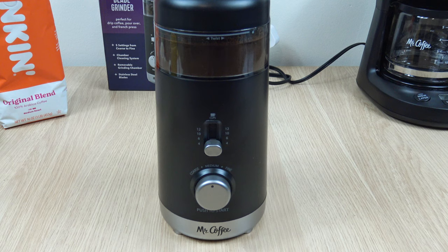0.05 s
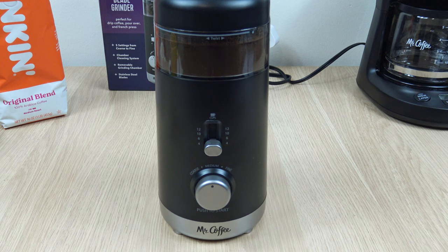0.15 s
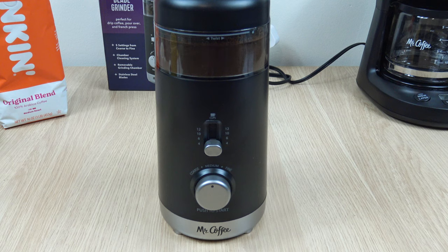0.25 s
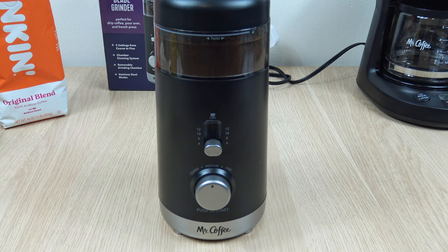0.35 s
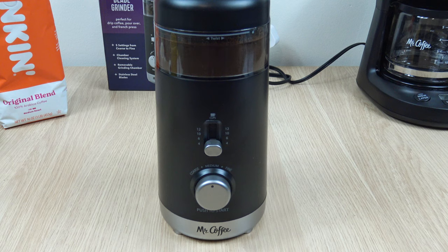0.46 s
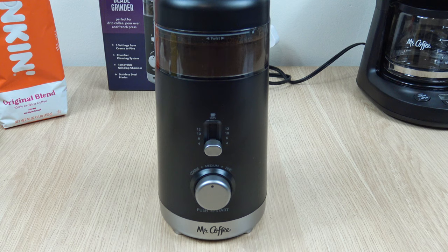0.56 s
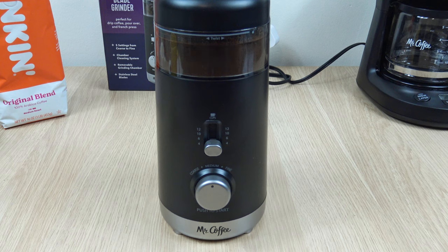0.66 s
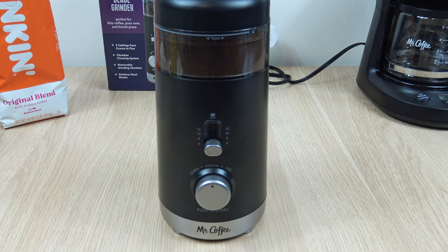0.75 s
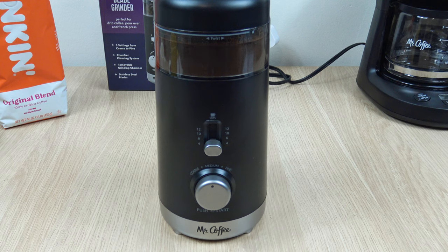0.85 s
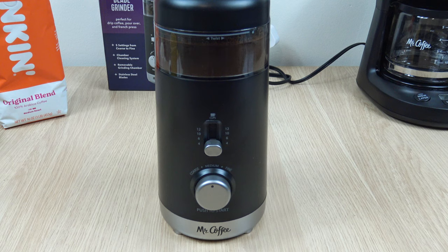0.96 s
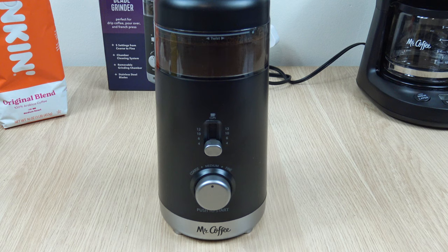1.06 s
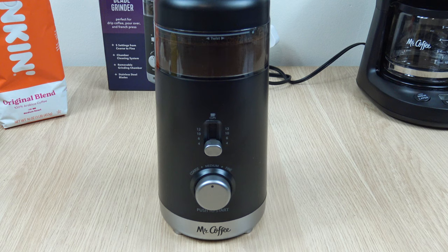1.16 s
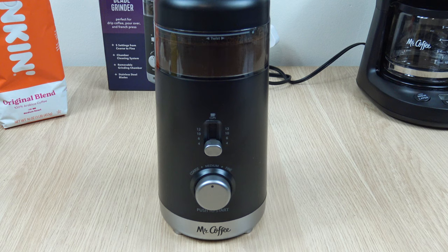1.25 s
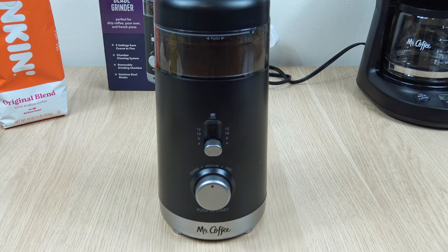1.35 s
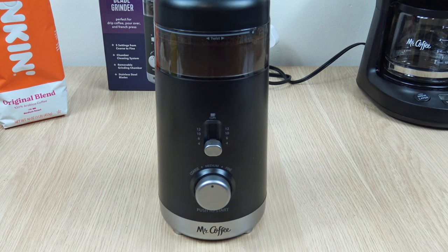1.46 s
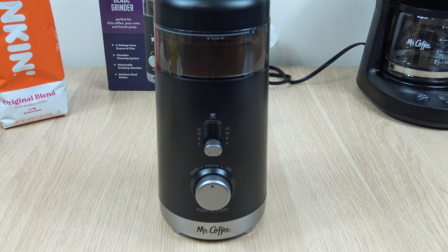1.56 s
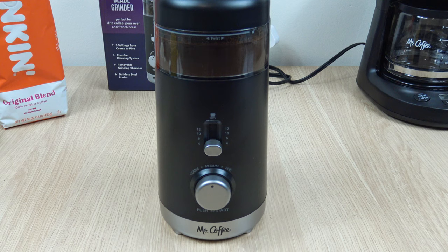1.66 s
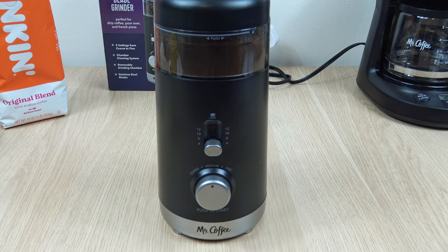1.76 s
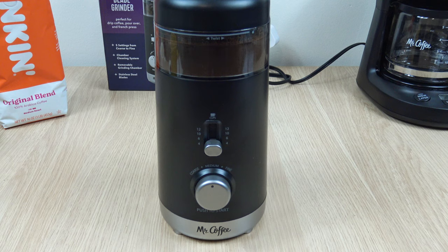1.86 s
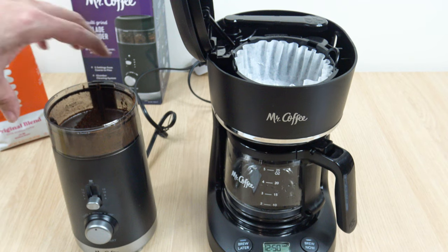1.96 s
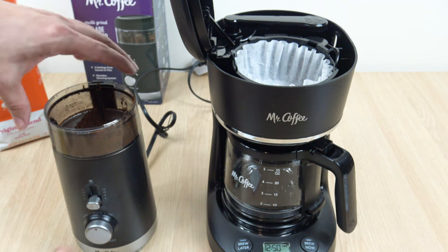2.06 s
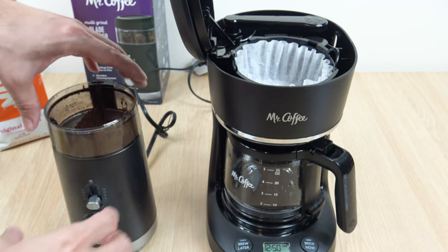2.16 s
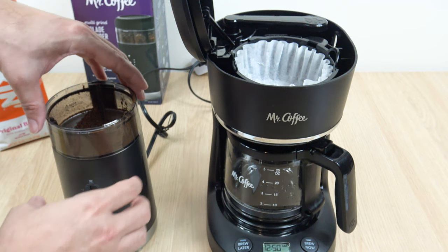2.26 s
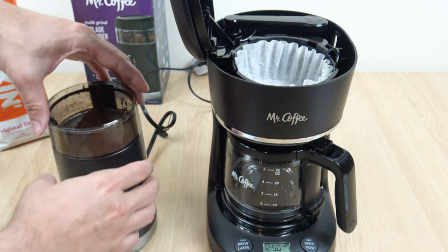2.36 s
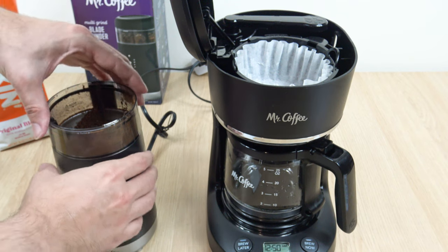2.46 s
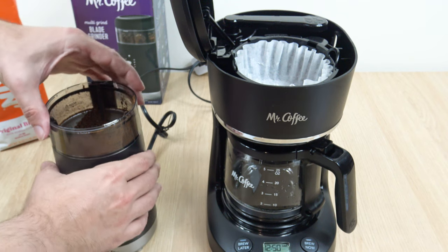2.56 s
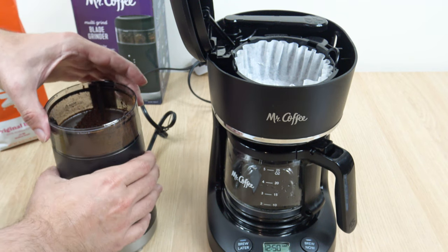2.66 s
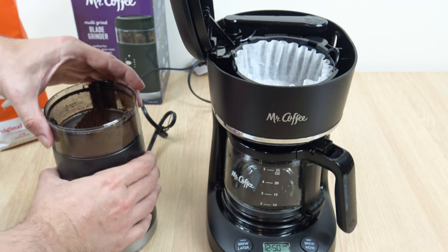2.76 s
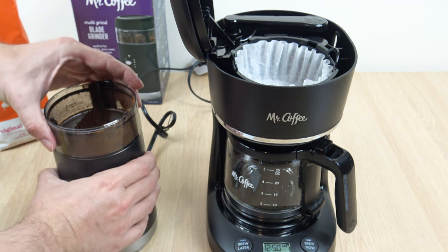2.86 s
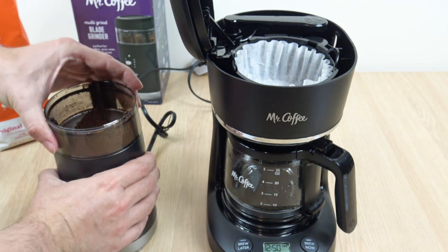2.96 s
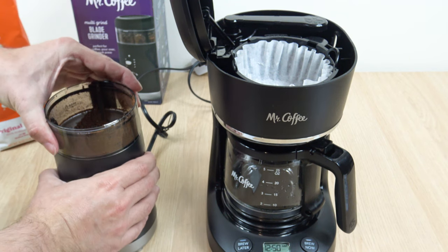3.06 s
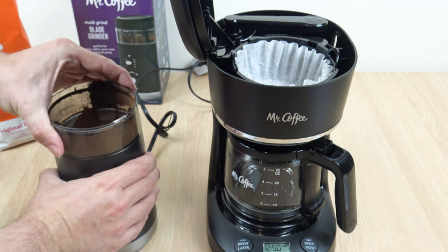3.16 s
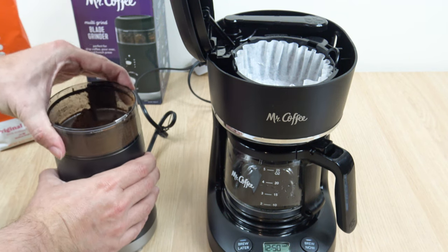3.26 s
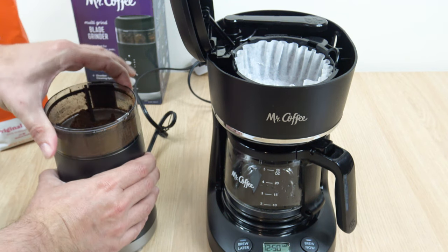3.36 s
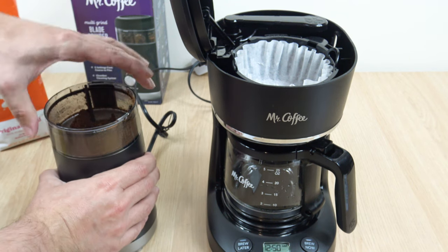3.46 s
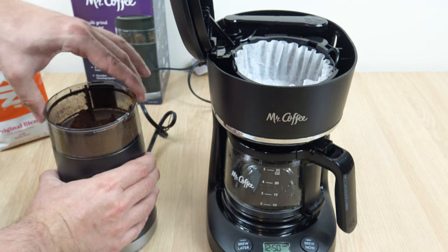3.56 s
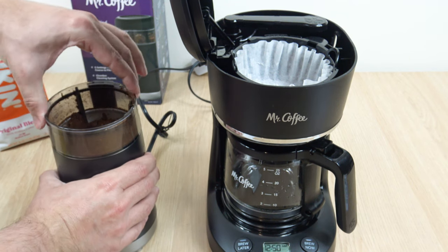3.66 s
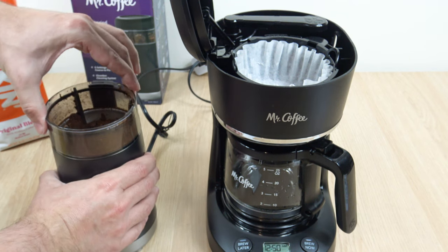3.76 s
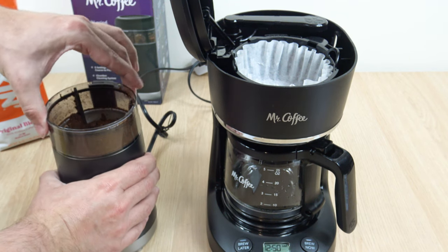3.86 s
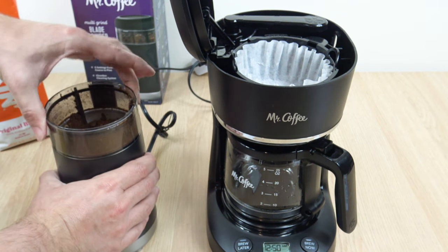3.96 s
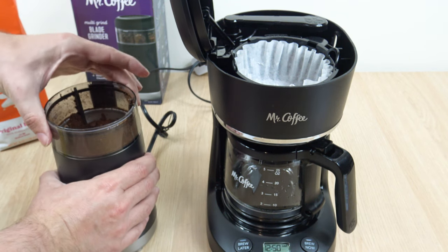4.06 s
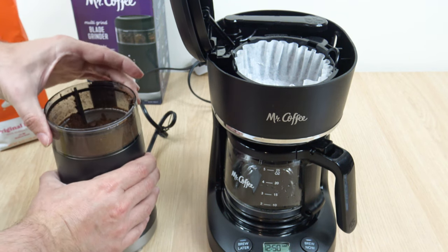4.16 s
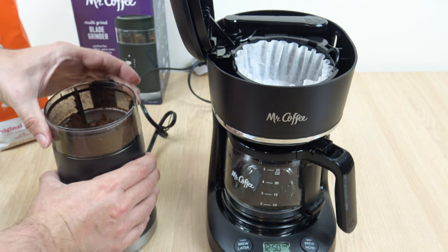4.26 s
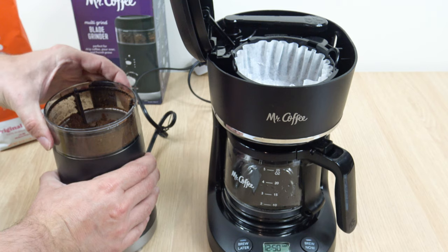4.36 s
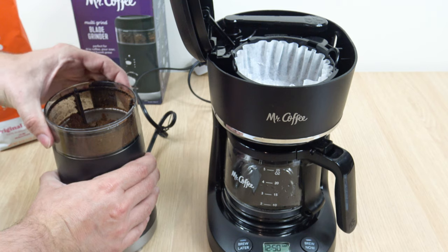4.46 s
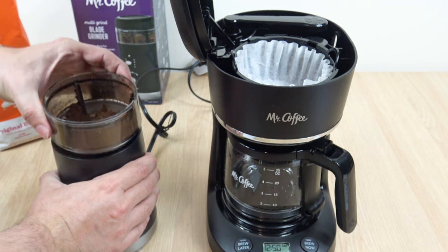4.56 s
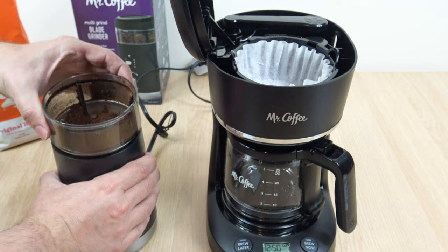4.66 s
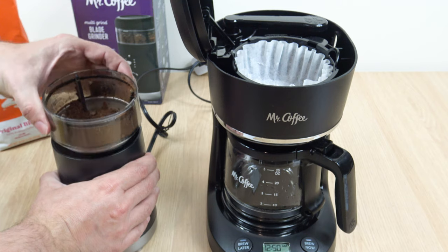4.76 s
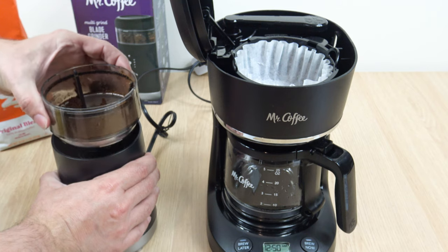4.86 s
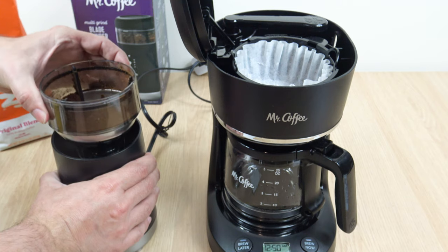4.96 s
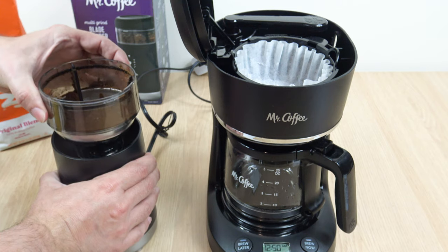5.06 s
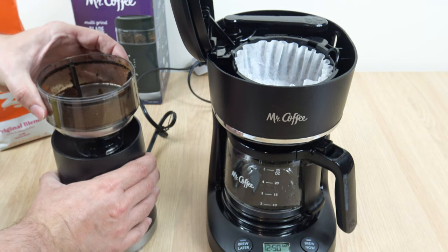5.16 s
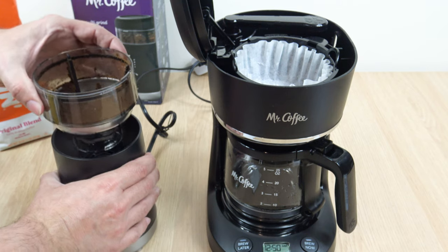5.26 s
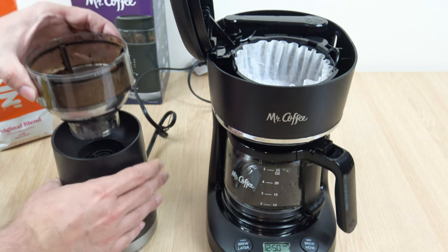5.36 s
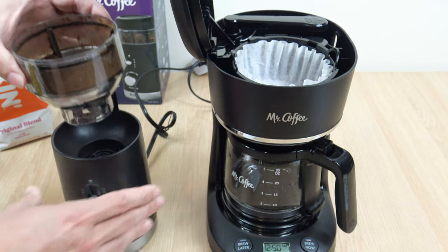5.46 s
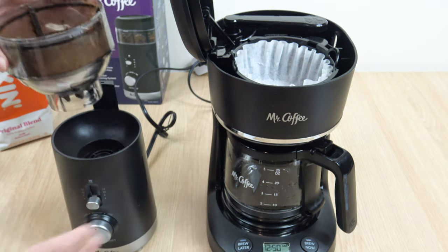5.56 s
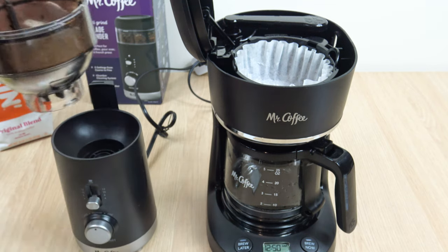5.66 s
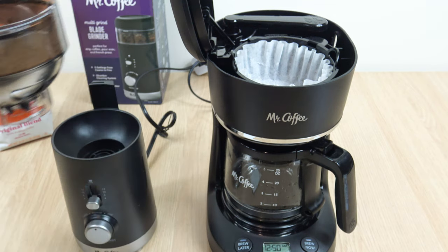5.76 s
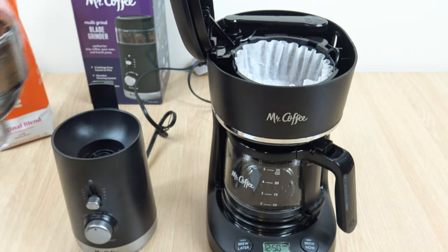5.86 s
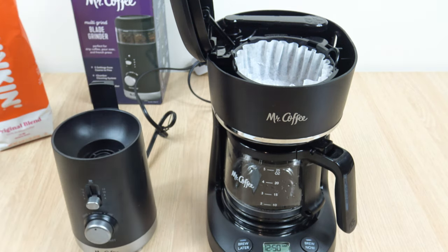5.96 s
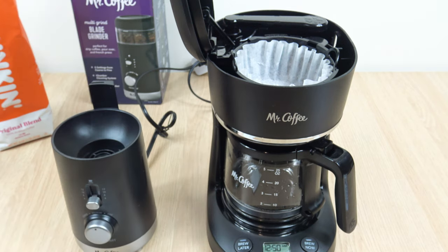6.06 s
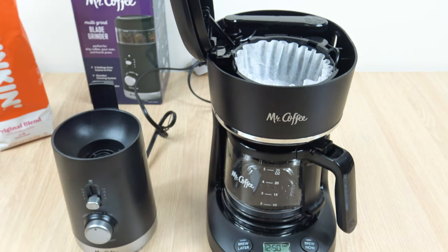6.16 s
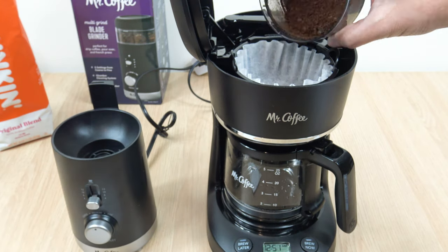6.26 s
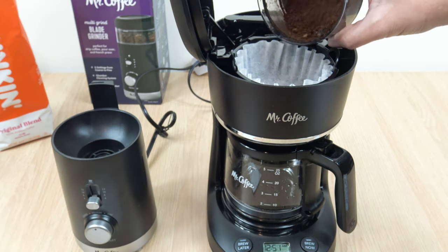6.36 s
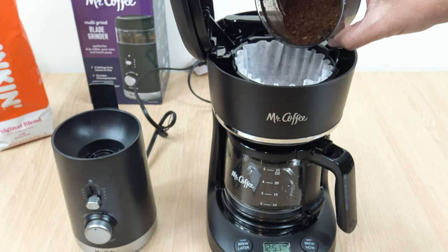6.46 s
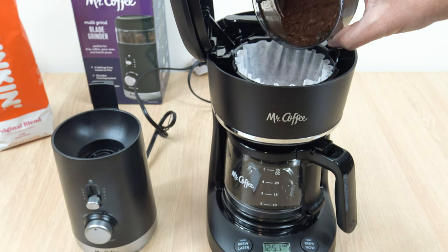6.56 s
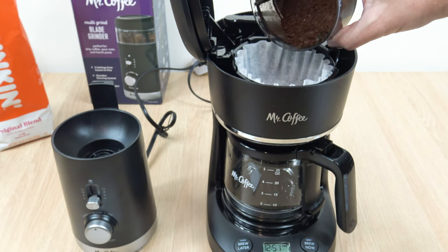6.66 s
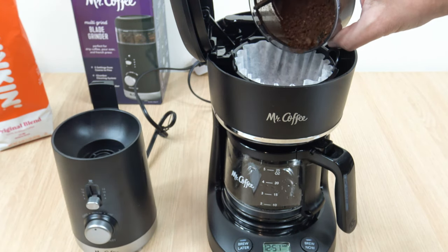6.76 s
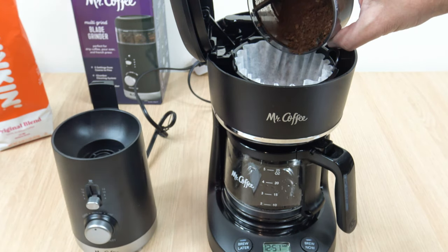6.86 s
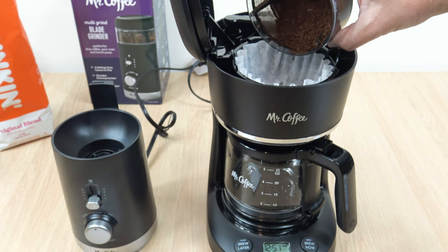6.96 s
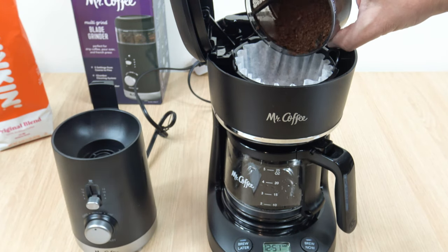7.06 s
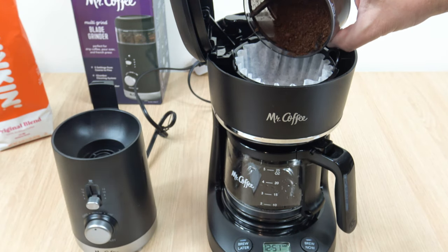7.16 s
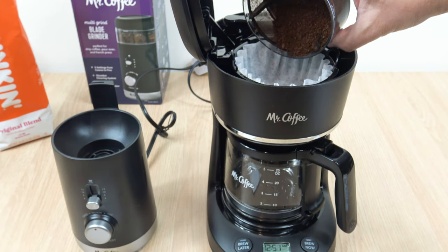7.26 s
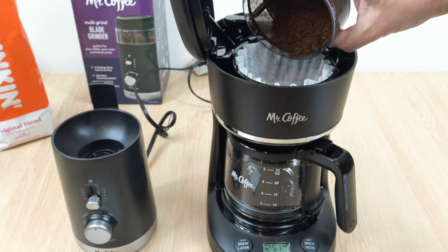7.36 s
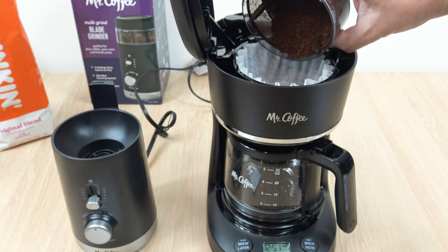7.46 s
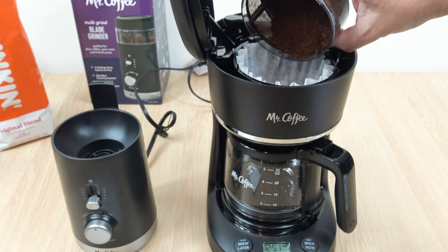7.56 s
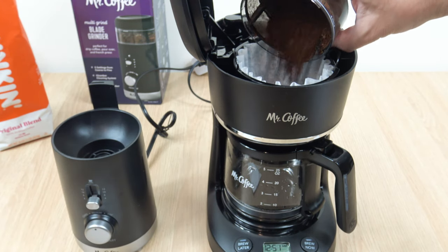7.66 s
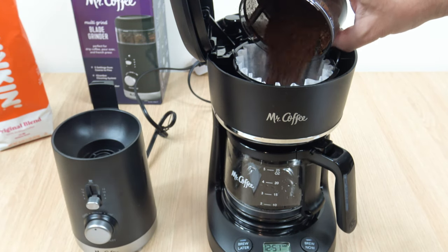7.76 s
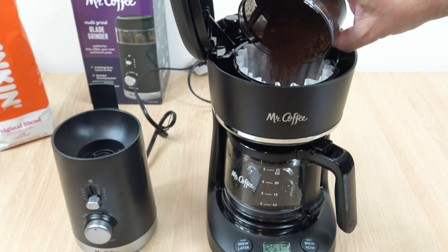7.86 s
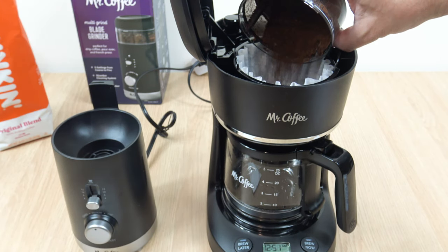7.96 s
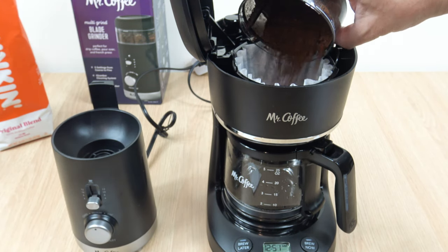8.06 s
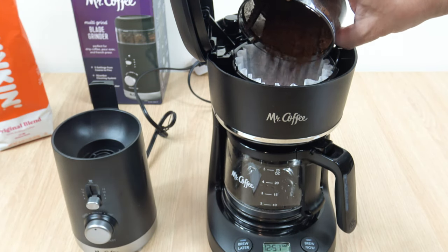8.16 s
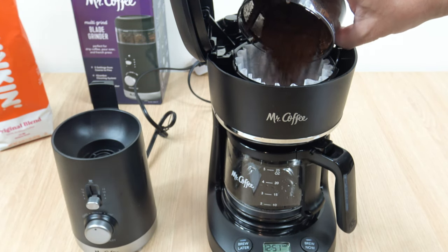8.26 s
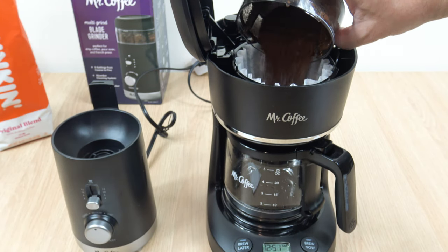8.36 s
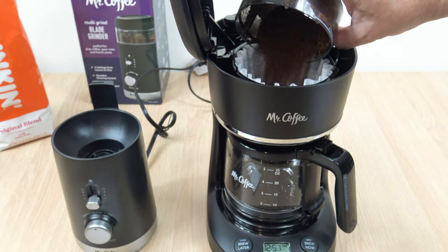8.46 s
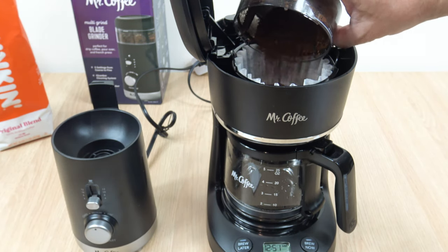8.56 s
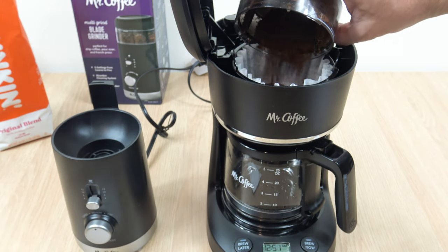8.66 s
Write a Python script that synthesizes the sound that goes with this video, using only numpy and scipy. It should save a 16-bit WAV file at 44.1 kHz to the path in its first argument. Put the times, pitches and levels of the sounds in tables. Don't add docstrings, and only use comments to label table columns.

```python
import sys
import numpy as np
from scipy import signal
from scipy.fft import rfft, irfft
from scipy.io import wavfile
from scipy.ndimage import uniform_filter1d

SR = 44100
rng = np.random.default_rng(int(sys.argv[2]) if len(sys.argv) > 2 else 0)


def master(y):
    cut = np.clip(np.atleast_2d(y).T, -1, 1)
    pcm = np.round(cut * 32767)
    wavfile.write(sys.argv[1], SR, pcm.astype(np.int16))


def field_ratio(decibels):
    return 10 ** (np.asarray(decibels, dtype=float) / 20)


N = 384552


def unit(x):
    return x / np.sqrt(np.mean(x ** 2))


def curves(table):
    s, *columns = np.transpose(table)
    t = np.arange(N) / SR
    gate = np.clip((t - s[0]) / .003 + 1, 0, 1) * np.clip((s[-1] - t) / .01 + 1, 0, 1)
    return gate, *(np.interp(t, s, c) for c in columns)


def colour(x, spectrum, peaks=()):
    hz = np.arange(x.shape[-1] // 2 + 1) * SR / x.shape[-1] + 1
    at, db = np.transpose(spectrum)
    gain = field_ratio(np.interp(np.log(hz), np.log(at), db))
    for centre, width, peak_db in peaks:
        gain = gain * field_ratio(peak_db / (1 + (2 * (hz - centre) / width) ** 2))
    return irfft(rfft(x) * gain, x.shape[-1])


def band(x, lo_hz, hi_hz):
    return signal.sosfilt(signal.butter(2, [lo_hz, hi_hz], "band", fs=SR, output="sos"), x)


def resonance(x, hz, width_hz):
    return unit(band(x, hz - width_hz / 2, hz + width_hz / 2))


def grains(rate, spread_db, smear_s):
    size = np.minimum(rng.exponential(size=N), 4)
    hit = (rng.random(N) < rate / SR) * field_ratio(spread_db * size)
    puff = signal.lfilter([1], [1, -np.exp(-1 / (smear_s * SR))], hit)
    return unit(puff * rng.standard_normal(N))


def walk(rate):
    k = int(SR / rate)
    steps = np.repeat(rng.standard_normal(N // k + 1), k)
    return unit(uniform_filter1d(uniform_filter1d(steps, k), k)[:N])


def strikes(times, parts):
    out, t = np.zeros(N + SR), np.arange(SR // 4) / SR
    for s, blow in zip(times, parts):
        start = int(s * SR)
        noise = rng.standard_normal(len(t))
        noise[0] = -7.0
        for lo_hz, hi_hz, decay_s, db in blow:
            x = band(noise * np.exp(-t / decay_s), lo_hz, hi_hz)
            out[start:start + len(t)] += x / abs(x).max() * field_ratio(db)
    return out[:N]


def swells(rows):
    t, power = np.arange(N) / SR, np.zeros((2, N))
    for s, rise_s, fall_s, *db in rows:
        near = slice(int((s - 2 * rise_s) * SR), int((s + 2 * fall_s) * SR))
        away = np.maximum((s - t[near]) / rise_s, (t[near] - s) / fall_s)
        power[:, near] += field_ratio(np.array(db)[:, None] - 17 * away) ** 2
    return np.sqrt(power)


# t/s, level/dB
CHIP_LEVEL = [
    (0.0, -16.5),
    (0.44, -17.5),
    (0.7, -16),
    (0.97, -18),
    (1.05, -21.5),
    (1.1, -28),
    (1.15, -38.5),
    (1.216, -49),
    (1.4, -73),
]
# t/s, turns f/Hz
SHAFT_SPEED = [(0, 357), (.45, 356), (.56, 298), (.65, 237), (.8, 151), (.87, 124), (.95, 100), (1.1, 66),
               (1.4, 45)]
# low f/Hz, high f/Hz, decay/s, peak level/dB
BLADE_STOP = [
    (4400, 6500, 0.02, -19.5),
    (6500, 8800, 0.011, -26.5),
    (885, 960, 0.0079, -25.5),
    (400, 2000, 0.008, -18),
]


def grinder():
    gate, chips_db = curves(CHIP_LEVEL)
    _, hz = curves(SHAFT_SPEED)
    turn = 2 * np.pi * np.cumsum(hz * (1 + 0.0023 * walk(57.6))) / SR
    free = np.clip((350 - hz) / 10, 0, 1)
    coasting = np.clip((302 - hz) / 129, 0, 1)
    octaves = np.log2(hz / hz[0])
    body = whirling_chips(turn, hz, chips_db, coasting) + shudder(hz, chips_db)
    tones = shaft_hum(turn, hz, free, octaves) + motor_whine(turn, hz, free, coasting, octaves)
    return gate * body + strikes([1.151], [BLADE_STOP]), gate * np.sqrt(2) * tones


# f/Hz, level/dB per Hz
DRIVEN_TONE = [(35, -52), (60, -36), (150, -18), (300, -14), (600, -10.5), (1300, -7.5), (2000, -11.5),
               (4300, -15.5), (7500, -16.5), (9500, -19), (14000, -24), (15800, -30)]
# f/Hz, level/dB per Hz
COASTING_TONE = [(60, -50), (150, -24), (300, -10.5), (600, -7.5), (1000, -6.5), (2000, -7), (2800, -2.5),
                 (4200, -12.5), (7400, -8), (9500, -13.5), (14000, -17.5), (15800, -19.5)]
# f/Hz, width/Hz, level/dB over the rest
CASING_PEAKS = [(240, 50, 5), (520, 60, 3), (930, 60, 7), (1720, 60, 4), (3240, 140, 3), (5650, 400, 7),
                (6750, 150, 4), (8130, 260, 8), (13250, 500, 7), (15000, 900, 9)]
# f/Hz, width/Hz, level/dB
FULL_CUP_PEAKS = [(1098, 41, 4.5), (1417, 57, 11.5), (2440, 52, 7), (2930, 380, 6.5), (7490, 660, 9)]
# f/Hz, width/Hz, level/dB
BARE_CUP_PEAKS = [(1450, 56.6, -1.5), (1127, 110, 12.5), (2750, 330, 6.5), (7340, 490, 9.5)]
# f/Hz, width/Hz, level/dB under the chips, shaft f/Hz below which it sings
LID = [(2726, 310, -5, 170), (3300, 130, -11, 126), (927, 69, -17.5, 71), (640, 37, -9.5, 140)]
# f/Hz, width/Hz, level/dB under the chips
FRAGMENT_NOTES = [(933, 61, -10.5), (2770, 400, -14.5)]


def whirling_chips(turn, hz, chips_db, coasting):
    clumping = np.clip((260 - hz) / 300, .15, .36) * np.clip(1 + .6 * walk(25), 0, 2)
    chips = grains(15000, 3.2, 0.00032) * (1 + clumping * np.cos(turn + 0.47 * walk(30.46)))
    driven = colour(chips, DRIVEN_TONE, CASING_PEAKS + FULL_CUP_PEAKS)
    slowing = colour(chips, COASTING_TONE, CASING_PEAKS + BARE_CUP_PEAKS)
    driven, slowing = (x / band(x, 1800, 12000).std() for x in (driven, slowing))
    casing = ((1 - coasting) * driven + coasting * slowing) * field_ratio(chips_db)
    for ring_hz, width_hz, db, below_hz in LID:
        sings = np.clip((below_hz - hz) / (.5 * below_hz), 0, 1)
        casing = casing + sings * resonance(chips, ring_hz, width_hz) * field_ratio(chips_db + db)
    fragments = grains(600, 3.5, .002) * field_ratio(3.8 * walk(14))
    for wall_hz, width_hz, db in FRAGMENT_NOTES:
        casing = casing + resonance(fragments, wall_hz, width_hz) * field_ratio(chips_db + db)
    return casing


def shudder(hz, chips_db):
    rocking_db = 17.5 / (1 + (2 * (hz - 78) / 17) ** 2)
    return unit(band(rng.standard_normal(N), 100, 162.3)) * field_ratio(chips_db - 27.5 + rocking_db - 5.0)


def shaft_hum(turn, hz, free, octaves):
    hum_db = -25 - 14 * (1 - free) + 6 * octaves - 3 * octaves ** 2
    tabletop = 1 / (1 + (118 / hz) ** 10)
    octave = field_ratio(-6.0) / (1 + ((2 * hz - 530) / 90) ** 2)
    return field_ratio(hum_db) * tabletop * (np.sin(turn) + octave * np.sin(2 * turn))


# multiple of the shaft rate, level/dB under the whine
MOTOR_ORDERS = [(2, -8), (3, -5), (8, -19), (10, -13.5)]


def motor_whine(turn, hz, free, coasting, octaves):
    whine_db = -22 - 8 * free + 9 * octaves
    whine = np.sin(4 * turn) * field_ratio(3.2 * walk(35.4))
    whine /= 1 + ((4 * hz - 1425) / 130) ** 2
    for k, db in MOTOR_ORDERS:
        whine += (1 - coasting) * field_ratio(db + 0.71 * walk(45.0)) * np.sin(round(k) * turn)
    return field_ratio(whine_db) * whine


# t/s, click peak level/dB, brightness (0 wall, 1 crack, 2 tick), thud peak level/dB, thud f/Hz
PLASTIC_KNOCKS = [(1.961, -36, .4, -59, 267), (2.844, -14.5, 0.53, -36.5, 446),
                  (2.921, -26.5, 1.38, -44, 348), (3.196, -24, 0.72, -19, 570),
                  (3.597, -41, 1.95, -43, 358), (3.776, -36, .05, -28, 1020), (3.777, -60, .05, -30.5, 495),
                  (3.813, -29.5, 0.6, -38.5, 155), (4.024, -30.5, 1.98, -34, 1000),
                  (4.028, -59, 1, -43, 149), (4.267, -55, 0.046, -35, 1000), (4.602, -25.5, 1.34, -30, 497),
                  (4.633, -28, 1.6, -32, 477), (4.709, -26, 0.97, -32, 513), (4.723, -50, .1, -31.5, 182.3),
                  (4.735, -47, .1, -31, 520), (4.818, -33, 0.85, -26.5, 560), (4.831, -45, 1, -29.5, 516),
                  (4.873, -27.5, 0.86, -43, 610), (4.877, -28, .3, -37, 1070), (4.886, -32, .05, -38, 190),
                  (4.908, -50, .05, -39, 180), (4.971, -26, 0.2, -35.5, 201),
                  (5.201, -21.5, 0.61, -36, 193), (5.204, -24, 0.27, -40, 188), (5.228, -42, 1, -33, 184),
                  (5.298, -30, 1.7, -51, 358), (5.384, -32.5, 1.17, -42.5, 424),
                  (5.409, -33, 0.91, -43.5, 184), (6.349, -35, .3, -44, 384), (6.439, -37, 0.72, -48, 198)]
# low f/Hz, high f/Hz, decay/s
CLICK_PARTS = [
    (1000, 2100, 0.0042),
    (1480, 5000, 0.01),
    (3900, 8300, 0.0077),
]
# t/s, peak level/dB,
# ring f/Hz, decay/s
PLASTIC_CLACKS = [(3.7, -39, 2600, .008), (3.712, -36, 1480, 0.0083), (3.715, -42.5, 4400, .015),
                  (3.745, -37, 560, .006), (1.158, -31, 934, 0.0096), (1.164, -29, 1206, 0.0056),
                  (3.198, -23, 5100, 0.0041), (4.579, -48, 3900, .006), (4.629, -38, 5300, 0.0055),
                  (4.632, -35, 3700, .006), (4.709, -28, 3650, 0.009), (4.712, -49, 7200, 0.0073),
                  (4.818, -37, 5170, .01), (4.873, -38, 5200, 0.0054), (4.873, -40, 7300, 0.0055),
                  (5.187, -45, 5400, .003), (5.187, -50, 7000, 0.0029), (5.202, -28.5, 1204, 0.0042),
                  (5.201, -38, 4770, .005), (5.203, -35, 3500, 0.0034)]
# firmest grip t/s, rise/s, fall/s, rub level/dB, drag through the table level/dB
HAND_RUBS = [(1.42, .1, 0.12, -59, -78), (1.558, 0.19, 0.073, -48, -60.5),
             (1.97, 0.025, 0.185, -51.5, -54.5), (2.594, 0.12, 0.31, -54, -60),
             (2.82, 0.09, 0.042, -58, -63), (2.955, .01, 0.1, -56.5, -64), (3.18, 0.0089, .004, -42.5, -43),
             (3.38, 0.085, 0.1, -56.5, -45.5), (3.46, 0.022, 0.031, -53.5, -59),
             (3.7, 0.045, 0.15, -45.5, -42.5), (3.745, 0.054, 0.029, -59.5, -39.5),
             (4.38, 0.086, 0.078, -59, -52), (5.038, .04, 0.086, -56, -42),
             (5.408, 0.069, 0.05, -45.5, -54.5), (6.25, 0.044, 0.15, -61, -53.5),
             (6.532, 0.27, 0.073, -56.5, -58)]
# f/Hz, level/dB per Hz
SKIN_TONE = [(1290, -90), (2200, -43), (2390, 6.5), (3330, 1.5), (7900, 0.5), (12900, -6.5), (16000, -4)]
# firmest t/s, rise/s, fall/s, rub level/dB, drag level/dB
CUP_TWISTS = [
    (4.582, 0.013, .1, -42.5, -48),
    (4.62, .04, 0.13, -40.5, -40.5),
    (4.712, 0.0059, 0.052, -42, -29.5),
    (4.826, 0.012, 0.088, -44.5, -46),
    (4.882, 0.014, 0.055, -49, -35.5),
]
# f/Hz, level/dB per Hz
RIM_TONE = [(2000, -38), (3000, -4.5), (8000, -16.5), (12000, -12), (16000, -28)]
# f/Hz, width/Hz, level/dB
RIM_PEAKS = [(3620, 510, 12), (4130, 230, 6), (5400, 550, 14.5), (7300, 900, 12.5)]


def handling():
    blows = []
    for _, db, bright, thud_db, hz in PLASTIC_KNOCKS:
        click = [(*part, db - 13 * abs(bright - k)) for k, part in enumerate(CLICK_PARTS)]
        thud = (0.852 * hz, 1.12 * hz, min(5.3 / hz, .013), thud_db)
        jolt = (60, 420, .015, thud_db - 9.5)
        blows.append(click + [thud, jolt])
    clacks = [[(hz * .93, hz * 1.07, decay_s, db)] for _, db, hz, decay_s in PLASTIC_CLACKS]
    rubs = scrape(HAND_RUBS, SKIN_TONE, (), 8000) + scrape(CUP_TWISTS, RIM_TONE, RIM_PEAKS, 2300)
    times = [row[0] for row in PLASTIC_KNOCKS + PLASTIC_CLACKS]
    return latch() + rubs + strikes(times, blows + clacks)


# f/Hz, level/dB per Hz
LATCH_TONE = [(35, -47.5), (60, -19), (141, -13), (199, -25), (282, -4), (399, -5), (480, -5), (1210, -7),
              (2200, -14.5), (3190, -21), (5180, -21), (15000, -38)]
# f/Hz, decay/s, peak level/dB
HOUSING_RINGS = [(595, 0.036, -26.5), (790, 0.02, -32), (1110, .03, -42), (1440, 0.015, -32),
                 (2240, 0.016, -20.5), (3500, 0.011, -26), (4420, .008, -24)]


def latch():
    latch_s = 3.183
    t = np.arange(N) / SR - latch_s
    since = np.maximum(t, 0)
    fade = np.exp(-since / 0.01) + field_ratio(-15) * np.exp(-since / 0.094)
    burst = np.clip(t / .002, 0, 1) * rng.standard_normal(N) * fade * field_ratio(2.8 * walk(169))
    burst[int(latch_s * SR) + 40] -= 36.0
    snap = colour(burst, LATCH_TONE) * np.clip(t / .002 + 1, 0, 1) ** 2
    rings = [(0.944 * hz, 1.09 * hz, decay_s, db) for hz, decay_s, db in HOUSING_RINGS]
    return snap / abs(snap).max() * field_ratio(4.5) + strikes([latch_s + 0.00094], [rings])


# f/Hz, width/Hz, level/dB
TABLE_NOTES = [(79.8, 23, -9.5), (146, 50, -1), (193, 40, 4), (264, 160, 4.5), (477, 68, 6)]


def scrape(touches, spectrum, peaks, rate):
    grit = grains(rate, 4.6, 0.0027)
    drag = sum(field_ratio(db) * resonance(grit, hz, width) for hz, width, db in TABLE_NOTES)
    rub, press = swells(touches)
    wall = field_ratio(-1) * np.sqrt(rub * press) * unit(band(grit, 300, 1470))
    return rub * unit(colour(grit, spectrum, peaks)) + wall + press * unit(drag)


# low f/Hz, high f/Hz, decay/s
STEEL_WALL, STEEL_BOWL = (1150, 1330, .005), (325, 390, .009)


def pouring():
    slide, notes_and_patter = sliding_grounds()
    cup = colour(slide + bean_chips(), [(1, 0), (SR, 0)], [(1600, 550, -6.5)])
    return notes_and_patter + cup + clump_taps()


# fullest flow t/s, rise/s, fall/s, hiss level/dB, cup ring level/dB
SURGES = [(6.65, 0.019, 0.066, -41.5, -64), (6.87, 0.069, 0.052, -37.5, -44),
          (6.935, 0.045, 0.19, -33, -39), (6.97, 0.027, 0.12, -32, -47), (7.1, 0.14, 0.11, -35, -53),
          (7.33, 0.0074, 0.057, -37, -35.5), (7.52, 0.076, 0.56, -46, -54), (7.68, 0.35, 0.3, -47, -46),
          (7.81, 0.24, .17, -31, -65), (8.0, .2, 0.4, -54, -66), (8.15, 0.22, 0.41, -38.5, -57),
          (8.38, 0.14, 0.7, -44.5, -58), (8.52, 0.3, 0.34, -42, -54.5), (8.72, 0.11, 0.065, -51, -50)]
# f/Hz, level/dB per Hz
SLIDE_TONE = [(260, -67), (450, -10), (538, -16.5), (868, -4.5), (1050, -7), (1230, 1.5), (1380, -17),
              (1650, -10.5), (2360, -5.5), (2700, -7.5), (5460, -6.5), (10400, -7), (16000, -20.5)]
# f/Hz, width/Hz, level/dB over the rest
CUP_PEAKS = [(2330, 260, 7), (2570, 60, 4), (3280, 120, 3), (3640, 150, 4), (5500, 500, 3)]
# f/Hz, level/dB per Hz
PAPER_TONE = [(200, -24), (420, 8), (800, -10.5), (1750, -0.5), (2600, -13.5), (7000, -5.5), (16000, -15)]


def sliding_grounds():
    t = np.arange(N) / SR
    flow, ring = swells(SURGES)
    heap = np.interp(t, (7.9, 8.3), (0, 1))
    sand = grains(3800, 4.3, .0006)
    flow = flow * field_ratio(1.2 * walk(30) + 1.7 * walk(110))
    hiss = unit(colour(sand, SLIDE_TONE, CUP_PEAKS)) * flow * field_ratio(-4 * heap)
    patter = unit(colour(np.roll(sand, SR), PAPER_TONE)) * flow * heap * field_ratio(-2)
    pebbles = grains(260, 4.0, .002)
    high_note = resonance(pebbles, 1194, 110) * ring
    low_note = resonance(pebbles, 361, 34) * (t > 6.1) * field_ratio(-51)
    return hiss, (high_note + low_note) * field_ratio(-3.0) + patter


# t/s, peak level/dB, ping f/Hz, cup ring level/dB
CHIP_HITS = [(6.632, -31, 4690, -47), (6.661, -23, 5800, -59), (6.6937, -29, 6100, -58),
             (6.723, -35.5, 2490, -59), (6.783, -30, 5140, -55), (6.824, -26, 4830, -50),
             (6.844, -25.5, 2330, -40), (6.867, -36, 7000, -39), (6.887, -24, 3600, -29),
             (6.92, -29, 2370, -42), (6.9644, -21, 3060, -18), (6.986, -22, 3430, -25),
             (7.04, -25, 2420, -48), (7.005, -32, 2400, -38.5), (7.077, -19, 2420, -27),
             (7.089, -26, 8200, -43), (7.12, -17.5, 5330, -41), (7.123, -17.5, 3420, -21.5),
             (7.188, -24, 6600, -27), (7.214, -24, 2530, -29.5), (7.233, -27.5, 5500, -42),
             (7.259, -29, 2450, -37.5), (7.3179, -24, 2580, -31), (7.434, -16.5, 6700, -40),
             (7.478, -24.5, 2300, -36), (7.501, -19.5, 2440, -32.5), (7.544, -23.5, 2440, -35),
             (7.595, -23, 3300, -33), (7.607, -24, 2400, -38), (7.626, -15.5, 2400, -45),
             (7.648, -32, 2350, -33.5), (7.685, -23, 2400, -41), (7.7405, -19, 2410, -56),
             (7.776, -21, 2380, -45), (7.794, -15, 6200, -51), (7.839, -24, 2416, -36),
             (7.817, -15.5, 5600, -54), (8.045, -33.5, 6700, -46), (8.101, -33.5, 8700, -44),
             (8.137, -27, 2570, -50), (8.152, -19.5, 2320, -40), (8.181, -30, 2190, -45),
             (8.2328, -22.5, 7340, -53), (8.351, -33, 3780, -53), (8.289, -33, 2560, -48),
             (8.4064, -28, 2160, -41), (8.503, -22, 2540, -30), (8.534, -23, 6300, -59),
             (8.614, -35.5, 7490, -55), (8.712, -30, 6500, -57), (8.639, -27, 7300, -52)]


def bean_chips():
    ticks = []
    for _, db, hz, ring_db in CHIP_HITS:
        clack = (2100, 7000, .003, db - 3.5)
        ping = (0.9414 * hz, 1.084 * hz, .003, db - 7.5)
        tick = (7000, 14000, .003, db - 46)
        shower = (2100, 12000, .03, db - 5.5)
        ticks.append([clack, ping, (*STEEL_WALL, ring_db), tick, shower])
    return strikes([row[0] for row in CHIP_HITS], ticks)


# t/s, tap peak level/dB, low note level/dB, ring level/dB
CUP_TAPS = [
    (6.887, -29, -46, -36),
    (6.964, -24, -33, -33),
    (7.058, -35, -56, -42),
    (7.164, -24, -29, -50),
    (7.317, -48, -53, -50),
    (7.337, -23, -31, -41),
    (7.369, -32, -30, -56),
    (8.102, -39, -29.5, -43),
    (8.299, -45, -40, -59),
    (8.505, -38, -52.5, -35),
]


def clump_taps():
    taps = [[(450, 1000, .004, db), (*STEEL_BOWL, note_db), (*STEEL_WALL, ring_db), (60, 280, .02, note_db - 9)]
            for _, db, note_db, ring_db in CUP_TAPS]
    return strikes([row[0] for row in CUP_TAPS], taps)


# f/Hz, level/dB
ROOM_TONE = [(100, 5.5), (500, -1), (2000, -1), (8000, -0.5), (16000, -43)]


def room(x):
    bass_t60_s, treble_t60_s = 0.4, 0.29
    t = np.arange(SR) / SR
    noise = rng.standard_normal(SR)
    bass = signal.sosfilt(signal.butter(1, 2000, fs=SR, output="sos"), noise)
    treble = noise - bass
    tail = bass * np.exp(-np.log(1000) * t / bass_t60_s) + treble * np.exp(-np.log(1000) * t / treble_t60_s)
    tail = tail * (t > .004)
    return colour(signal.fftconvolve(x, tail / np.sqrt(np.sum(tail ** 2)))[:N], ROOM_TONE)


# f/Hz, level/dB per Hz
KITCHEN_TONE = [(25, -29.5), (45, -0.5), (70, -6), (130, 1.5), (400, 2.5), (510, 0), (620, -8.5),
                (1000, -7), (1300, -11.5), (1900, -20.5), (3200, -20.5), (6000, -25), (15000, -29.5)]
KITCHEN_LEVEL_DB = -48.5


def kitchen():
    t = np.arange(N) / SR
    before = np.clip((1.94 - t) / .03, 0, 1)
    throb = field_ratio(-57.5 - 19 * before) * np.sin(2 * np.pi * 27 * t)
    air = unit(colour(rng.standard_normal(N), KITCHEN_TONE)) * field_ratio(KITCHEN_LEVEL_DB + 0.4 * walk(4.72))
    return air + np.sqrt(2) * throb


# f/Hz, level/dB
REFLECTIONS_APART = [(60, -22), (300, -20), (700, -25), (1000, -31), (3800, -32), (5500, -20), (8000, -19),
                     (11000, -24)]
# f/Hz, level/dB
KITCHEN_APART = [(60, -23), (400, -21), (900, -13.5), (1800, -17), (3000, -17), (16000, -32)]
# f/Hz, level/dB per Hz
PORT_HISS_TONE = [(3500, -44), (5000, -4.5), (8000, -3), (11500, -7), (13500, -31)]
# f/Hz, level/dB
POUR_LEAN = [(100, -24), (500, -13.5), (1000, -15), (1800, -14.5), (2500, -22), (16000, -28)]


def port_difference(mid, pour):
    t = np.arange(SR // 4)
    scatter = rng.standard_normal(SR // 4) * np.exp(-t / (.04 * SR))
    scatter /= np.sqrt(np.sum(scatter ** 2))
    side = colour(signal.fftconvolve(mid, scatter)[:N], REFLECTIONS_APART)
    air = unit(colour(rng.standard_normal(N), KITCHEN_TONE))
    side += colour(air, KITCHEN_APART) * field_ratio(KITCHEN_LEVEL_DB)
    side += unit(colour(rng.standard_normal(N), PORT_HISS_TONE)) * field_ratio(-72.5)
    return side - colour(pour, POUR_LEAN)


def scene():
    body, tones = grinder()
    hands = handling()
    pour = pouring()
    near = body + hands
    mid = near + tones + pour + field_ratio(-6) * room(near + pour) + kitchen()
    side = port_difference(mid, pour)
    return np.array([mid + side, mid - side])


def roll_off(x):
    return signal.sosfilt(signal.butter(12, 15900, fs=SR, output="sos"), x)


# f/Hz, left minus right level/dB
PORT_MISMATCH = [(60, -1), (110, -.5), (200, 1), (380, 3), (700, 1), (1290, 0), (15000, 0)]


def record(dry):
    hz, db = np.transpose(PORT_MISMATCH)
    ports = np.array([colour(x, np.transpose([hz, way * db / 2])) for x, way in zip(dry, (1, -1))])
    rounded = np.tanh(1.35 * ports) / 1.35
    top = signal.ellip(10, .2, 60, 15850, fs=SR, output="sos")
    return roll_off(signal.sosfilt(top, rounded))


dry = scene()
out = record(dry)
master(out)
```